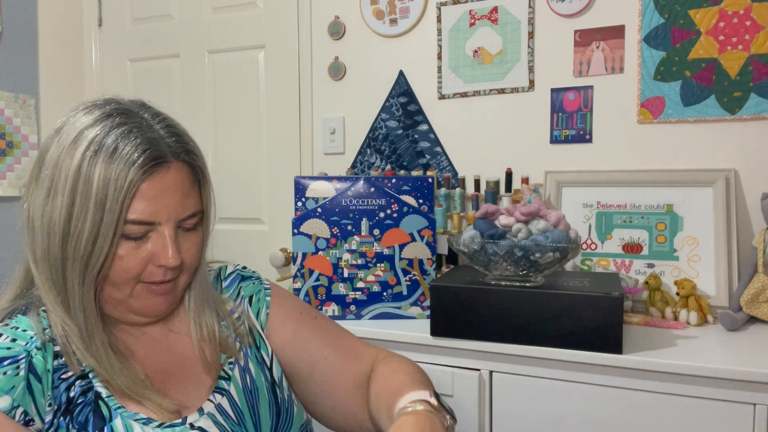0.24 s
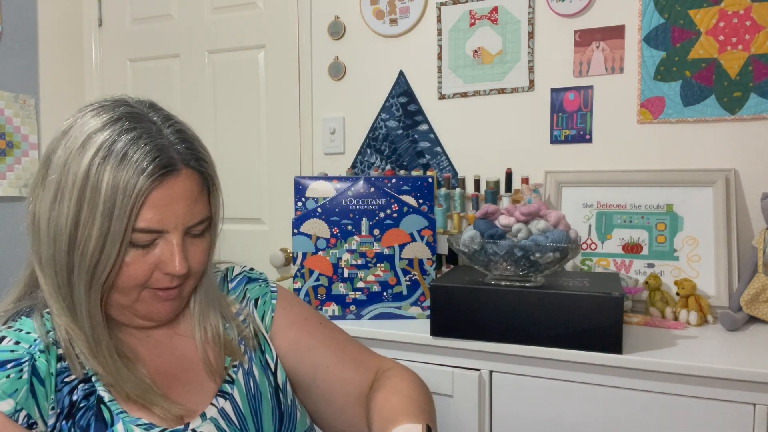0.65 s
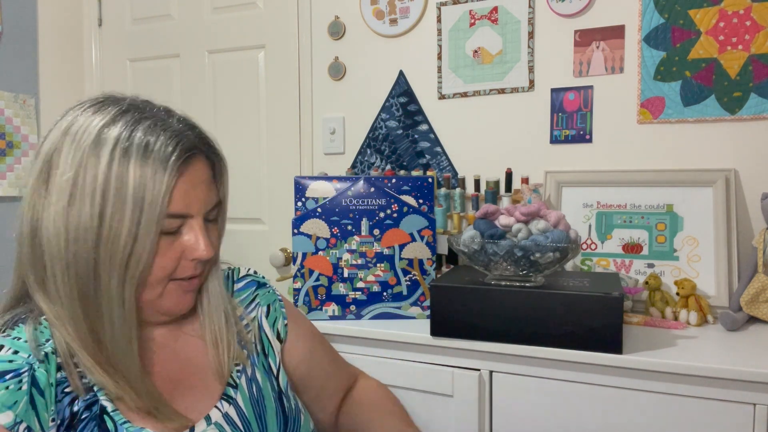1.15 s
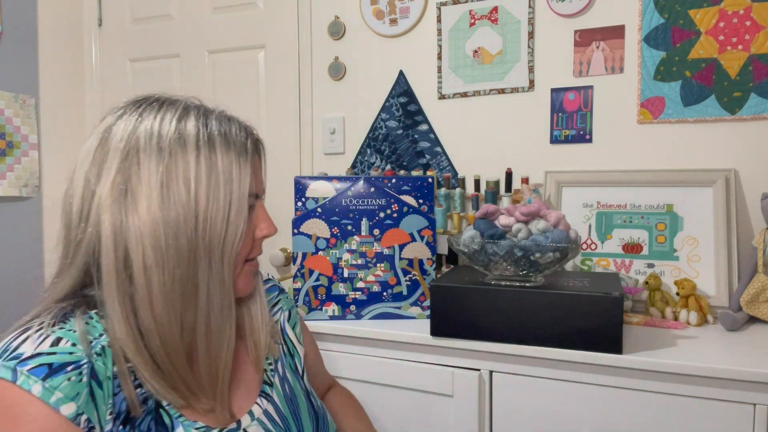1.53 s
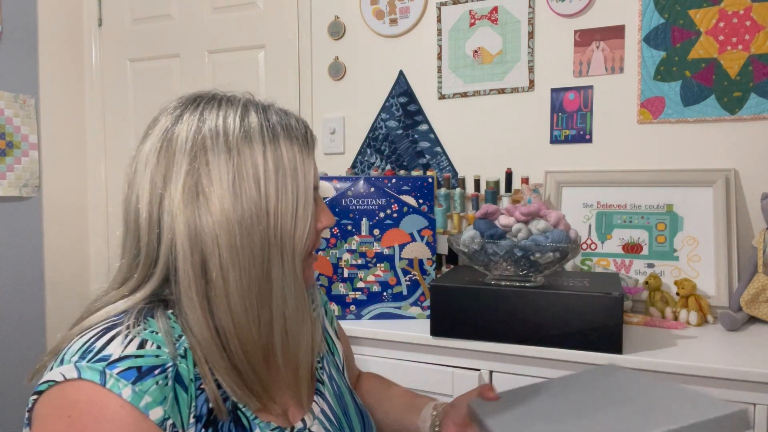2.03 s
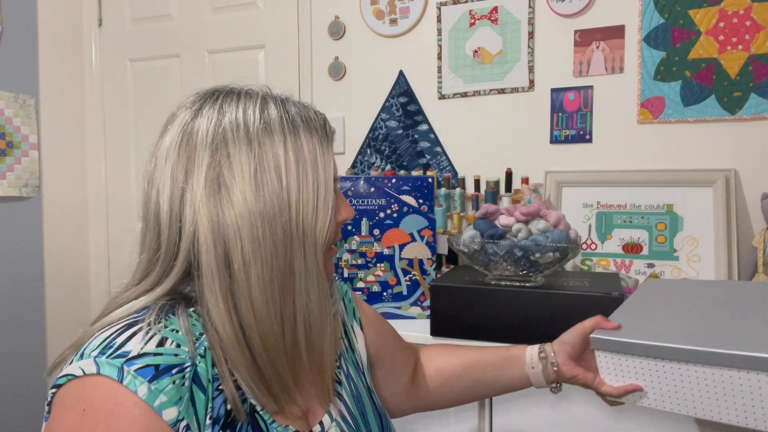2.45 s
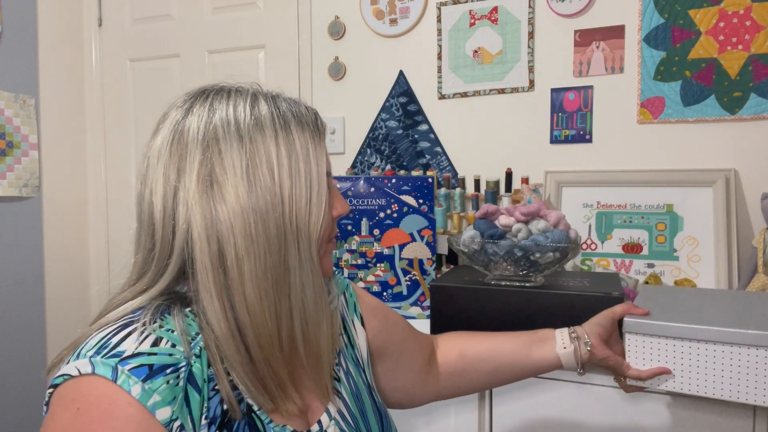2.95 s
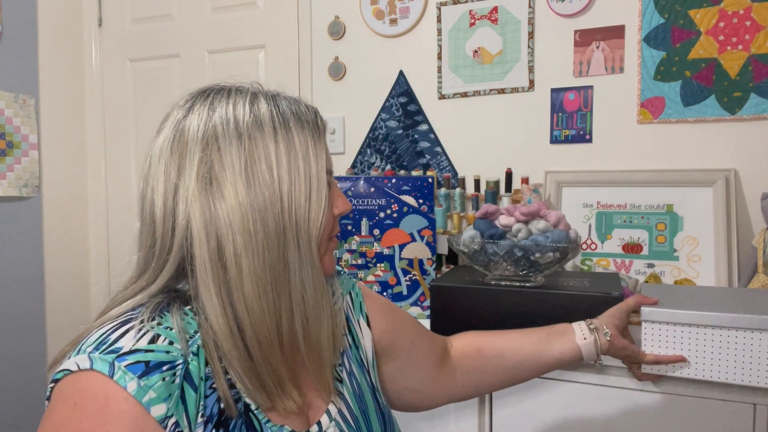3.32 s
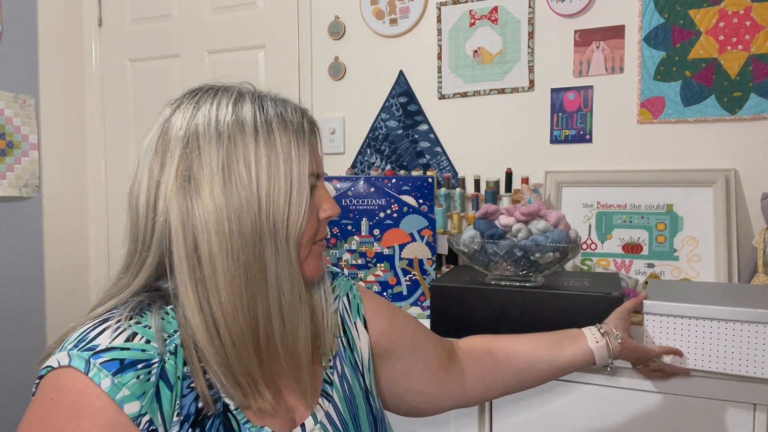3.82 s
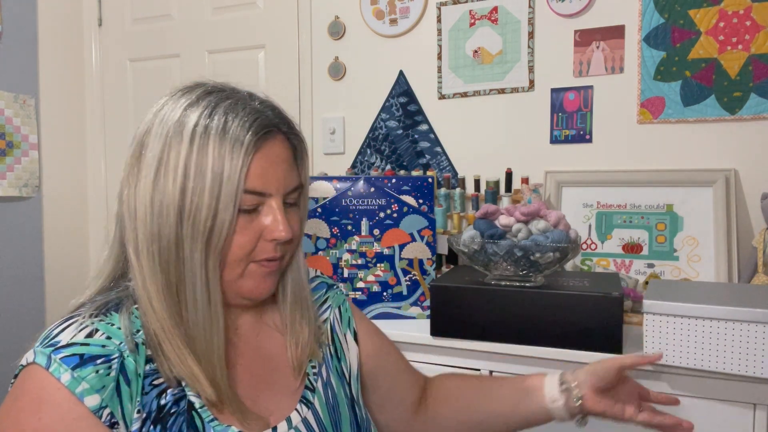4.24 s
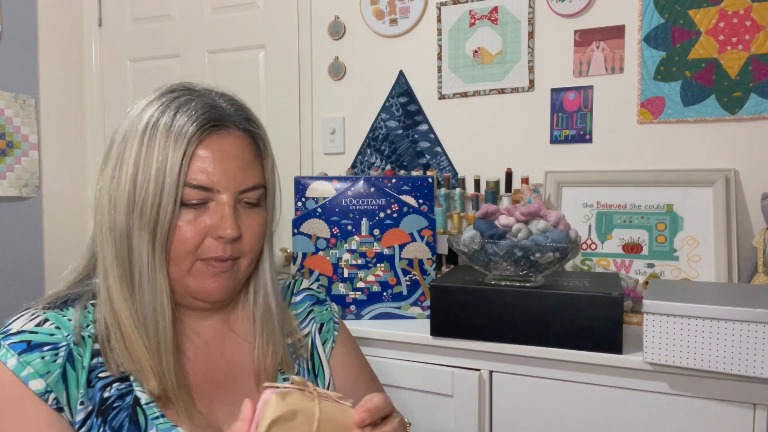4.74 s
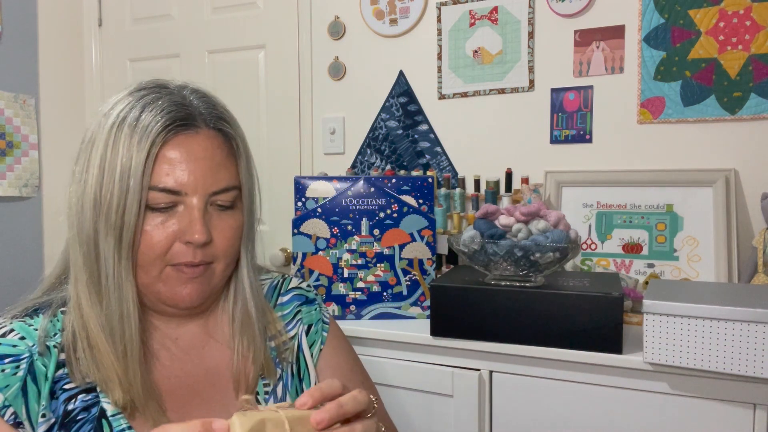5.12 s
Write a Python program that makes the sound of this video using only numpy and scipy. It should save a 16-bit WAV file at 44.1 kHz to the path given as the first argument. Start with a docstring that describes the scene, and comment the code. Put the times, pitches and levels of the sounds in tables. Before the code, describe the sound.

A quiet small room with faint low rumble and hiss, heard by a nearby stereo microphone. Cardboard rubbing swells from the start, and at about 0.37-0.45 s a box is bumped shut with the loudest, hollow, booming thumps and a short rasp. Low juddering drags and soft knocks follow at 0.6-0.85 s. A sharp bracelet tick snaps at 1.16 s, then muffled bumps and shuddering rubs run from 1.3 to 1.85 s, strongest near 1.68 s. Fainter taps fade into near silence from 2.2 to 2.8 s. A scrape leads into the set-down at 3.0-3.16 s: clustered woody knocks with hard rim cracks. The box slides with a soft, grainy scrape until about 3.75 s. A light release tap comes at 3.98 s, small bright ticks at 4.25-4.5 s. From 4.6 s paper rustles finely, with a crisp snap at 4.8 s, light taps, and little crackles to the end.

```python
"""A cardboard box is bumped shut, picked up, set on a cabinet and pushed into place in a small furnished room.
Knocks ring its panels as decaying modes; sliding shakes them with random slips and sawtooth judders.
A bracelet ticks on the moving wrist in sharp snaps. Then a hand takes up a small paper packet:
snapping creases crackle, and fine grains of friction rustle. A stereo microphone stands near by."""
import sys
import numpy as np
from scipy import signal
from scipy.fft import rfft, irfft
from scipy.io import wavfile

SR = 44100
rng = np.random.default_rng(int(sys.argv[2]) if len(sys.argv) > 2 else 0)


def wav_record(signal):
    """Record a signal, one row per channel, as 16-bit PCM in the file named by sys.argv[1]."""
    frames = np.transpose(np.atleast_2d(signal))
    bounded = np.clip(frames, -1, 1)
    # unit amplitude maps onto the largest positive 16-bit level
    quanta = np.round(bounded * 32767).astype(np.int16)
    wavfile.write(sys.argv[1], SR, quanta)


N = 236946
TIME = np.arange(N) / SR
TOP_HZ = 16100  # upper limit of the microphone

# panel modes of box and cabinet: pitch_hz, level_db, t60_s (undamped, before the limit set in ring)
BOX_MODES = [(84.1, -12.5, 0.096), (119.7, -7, 0.26), (182.1, -6.5, 0.23), (243.4, 0, 0.15),
             (277.3, 4.5, 0.086), (354, 0.5, 0.083), (680, -24, .15), (795.5, -7, .15), (893, -18, 0.3),
             (1328, -9, 0.052), (1560, -34.5, 0.2)]
CABINET_MODES = [(86.2, -9.5, 0.15), (142.2, -2, 0.11), (180, -0.5, 0.17), (240.4, 1.5, 0.077),
                 (283, 2.5, 0.13), (364, 11, 0.035), (792, -3, 0.2), (921, 2.5, 0.059), (1159, -5.5, 0.12)]


def undb(db):
    """Decibels to gain."""
    return 10 ** (np.asarray(db) / 20)


def unit(x):
    """Scale to rms 1."""
    return x / np.sqrt(np.mean(x ** 2))


def lookup(table, hz):
    """Read (Hz, value) points on a log-frequency axis."""
    f, value = np.transpose(table)
    return np.interp(np.log(hz + 1), np.log(f), value)


def convolve(x, response):
    """Pass a sound through a response, keeping its length."""
    return signal.fftconvolve(x, response)[:len(x)]


def colour(x, spectrum, size=4096):
    """Causal minimum-phase filter of unit energy, shaped by the given spectrum."""
    gain = undb(lookup(spectrum, np.fft.rfftfreq(size, 1 / SR)))
    cepstrum = irfft(np.log(gain))
    # folding the cepstrum forward makes the filter respond at once
    cepstrum[1:size // 2] *= 2
    cepstrum[size // 2 + 1:] = 0
    response = irfft(np.exp(rfft(cepstrum)))
    return convolve(x, response / np.linalg.norm(response))


def cut(x, hz, kind, order=2):
    """Low-pass or high-pass."""
    sos = signal.butter(order, min(hz, SR / 2 - 1000), kind, fs=SR, output="sos")
    return signal.sosfilt(sos, x)


def add(out, s, sound):
    """Mix a sound in at time s."""
    start = max(int(s * SR), 0)
    out[..., start:start + sound.shape[-1]] += sound[..., :N - start]


def burst(t60, size=16384):
    """A dying spray of noise of unit energy."""
    spray = rng.standard_normal(size) * undb(-60 * TIME[:size] / t60)
    return spray / np.linalg.norm(spray)


def ring(modes, damping=1, rise_s=0.00028, size=16384):
    """Response of a tapped panel, of unit energy; neighbouring modes swing oppositely, so the boom builds up."""
    longest_ring_s = .4
    t, tone = TIME[:size], 0
    for k, (hz, db, t60) in enumerate(modes):
        # card is lossy: the higher the mode, the lower the limit on its ring
        t60 = min(t60, longest_ring_s / (1 + hz / 300))
        envelope = undb(db - 60 * damping * t / t60)
        tone = tone + (-1) ** k * envelope * np.cos(2 * np.pi * hz * t)
    tone = cut(tone * (1 - np.exp(-t / rise_s)), 82.7, "high")
    return tone / np.linalg.norm(tone)


def friction(rate, spread_db, patchy_db, patch_rate=45):
    """Tiny slips of unequal size, coming in patches as the surfaces catch and let go; rates per second."""
    slips = (rng.random(N) < rate / SR) * rng.choice([-1, 1], N)
    sizes = undb(spread_db * np.minimum(rng.exponential(size=N), 4))
    patches = np.interp(TIME * patch_rate, np.arange(N), rng.standard_normal(N))
    return unit(slips * sizes * undb(patchy_db * patches))


def gestures(table, attack_s, release_s):
    """A hand's swell, hold and release per row, summed in power; one gain curve for each dB column."""
    power = np.zeros((len(table[0]) - 2, N))
    for s, length, *db in table:
        start = max(s - attack_s, 0)
        t = TIME[:int((attack_s + length + release_s) * SR)] + start - s
        # attack and release are the times to move 60 dB
        fade = np.maximum(-t, 0) / attack_s + np.maximum(t - length, 0) / release_s
        add(power, start, np.outer(undb(db), undb(-60 * fade)) ** 2)
    return np.sqrt(power)


def knocks(table, modes, ring_db, slap_db, slap_t60):
    """Each blow rings the panels and slaps the card; a softer contact keeps only the low notes."""
    # spectrum of the slap: pitch_hz, level_db
    slap_spectrum = [(60, -15), (200, 1), (400, 4), (800, -3), (1400, -15.5), (2500, -5), (5000, -9.5),
                     (15000, 2.5)]
    out, tone = np.zeros(N), ring(modes)
    for s, db, corner_hz, extra_db in table:
        slap = colour(burst(slap_t60), slap_spectrum)
        blow = undb(ring_db) * tone + undb(slap_db + extra_db) * slap
        add(out, s, undb(db) * cut(blow, corner_hz, "low", order=3))
    return out


def clicks(table, spectrum, level_db, click_t60, splinter_db):
    """One sharp snap with a little splintering; the smaller the thing that snaps, the less bass it has."""
    out = np.zeros(N)
    for s, db, low_hz in table:
        snap = undb(splinter_db) * burst(click_t60, size=2048)
        snap[0] += 1
        snap = cut(colour(snap, spectrum), low_hz, "high", order=4)
        add(out, s, undb(level_db + db) * snap)
    return out


def room(dry, wet_db, right_db, lag_ms, apart=2.86, gap_s=0.00018, diffuse_hz=380, count=12, size=3):
    """Direct sound, later at the left port, plus a short tail that differs at the two ports and keeps shifting."""
    # reverberation time of the room: pitch_hz, t60_s
    room_t60 = [(200, 0.25), (1000, 0.2), (4000, 0.14), (8000, 0.13)]
    moves_per_s = 9  # new patterns of reflections per second
    t = TIME[:SR // 3]
    octave = np.log2(np.fft.rfftfreq(len(t), 1 / SR) + 1)
    centres = np.linspace(np.log2(100), np.log2(TOP_HZ), count)
    shared, *own = rfft(rng.standard_normal((3, size, len(t))))

    # the sound wanders among several tails at constant total power
    paths = rng.standard_normal((size, 100))
    places = np.array([np.interp(TIME * moves_per_s, np.arange(len(path)), path) for path in paths])
    sent = dry * places / np.linalg.norm(places, axis=0)

    ports = []
    for field in shared + apart * np.array(own):
        tails = 0
        for centre, band in zip(centres, np.eye(count)):
            noise = irfft(field * np.interp(octave, centres, band), len(t))
            tails = tails + noise * undb(-60 * t / lookup(room_t60, 2 ** centre))
        # the tail waits for the first reflection and lacks deep bass
        tails = cut(tails * np.clip(t / gap_s - .5, 0, 1), diffuse_hz, "high")
        wet = sum(convolve(part, tail / np.linalg.norm(tail)) for part, tail in zip(sent, tails))
        ports.append(dry + undb(wet_db) * wet)

    lag = np.exp(-2j * np.pi * np.fft.rfftfreq(N, 1000 / SR) * lag_ms)  # frequency in kHz
    left = irfft(rfft(ports[0]) * lag, N)
    return np.array([undb(-right_db / 2) * left, undb(right_db / 2) * ports[1]])


def room_air():
    """A faint steady rumble, partly shared by the two ports, and a separate hiss in each."""
    # spectrum of the air: pitch_hz, level_db
    air_spectrum = [(20, -11.5), (50, -3), (85, 0), (130, -11), (280, -12.5), (600, -16.5), (1500, -25.5),
                    (5000, -34), (16000, -56)]
    air_db, mic_hiss_db = -60.5, -72
    shared, left, right = (colour(noise, air_spectrum) for noise in rng.standard_normal((3, N)))
    hiss = undb(mic_hiss_db) * rng.standard_normal((2, N))
    air = unit(0.6 * cut(shared, 280, "low") + np.array([left, right]))
    return undb(air_db) * air + hiss


def packet_taps():
    """Fingers land on the packet, ringing its small panels and slapping the wrapping."""
    # landings: start_s, level_db, contact_corner_hz, slap_db
    taps = [(4.7965, -17.5, 1860, 6), (4.839, -20, 2000, -9), (4.911, -22, 2230, 2), (4.950, -32, 1800, -1),
            (4.981, -25.5, 1600, 3)]
    # panel modes: pitch_hz, level_db, t60_s (before the limit set in ring)
    packet_modes = [(314, -2, 0.11), (474, -8, 0.1), (764, 0, 0.037), (932, 8.5, 0.042), (1230, 12, 0.017),
                    (1590, 1.5, 0.023)]
    return knocks(taps, packet_modes, ring_db=0.5, slap_db=13.0, slap_t60=0.079)


def packet_creases():
    """Creases of the packet snap with a short splintering crackle."""
    # snaps: start_s, level_db, lowest_pitch_hz
    creases = [(4.7945, -3, 880), (4.7961, -6.5, 510), (4.839, -29, 800), (4.911, -13, 890),
               (4.919, -12.5, 1200), (4.980, -27, 910), (5.1205, -16.5, 2320), (5.216, -17.5, 2370),
               (5.268, -14.5, 2540)]
    # spectrum of a snap: pitch_hz, level_db
    crease_spectrum = [(100, -10.5), (450, 4), (900, 0), (1800, 8), (3500, 6), (7000, 6), (12000, -7),
                       (16000, -18)]
    return clicks(creases, crease_spectrum, level_db=-14.0, click_t60=0.0085, splinter_db=9.5)


def rustling_packet():
    """Fingers brush the wrapping in fine grains, small crinkles break through, and paper flexes in coarser folds."""
    # fingers brushing over skin and wrapping: full_speed_s, length_s, level_db
    brushes = [(.865, 0.016, -54.5), (1.13, 0.12, -51), (1.61, 0.033, -52.5), (4.07, 0.464, -63.5),
               (4.582, 0.042, -48.5), (4.68, 0.086, -48), (4.805, 0.084, -45.5), (4.897, 0.027, -43),
               (4.96, 0.048, -54), (5.053, 0.14, -49.5), (5.254, 0.028, -42.5), (5.355, .02, -52)]
    # the packet flexes under a squeeze: full_force_s, length_s, level_db
    squeezes = [(4.59, 0.48, -60.5), (4.80, 0.087, -53.5), (4.942, 0.028, -48), (5.025, 0.015, -57)]
    # spectra of brushed paper and of flexing: pitch_hz, level_db
    paper_spectrum = [(700, -28), (2000, -10), (3500, -1.5), (7000, -1), (12000, -1.5), (16000, -23)]
    flex_spectrum = [(120, -13.5), (420, 7), (900, -2.5), (1400, -1), (2200, -2.5), (5000, -44)]
    brush, = gestures(brushes, attack_s=0.15, release_s=0.09)
    flex, = gestures(squeezes, attack_s=.015, release_s=.07)
    grains = friction(rate=7700, spread_db=1.5, patchy_db=2.5, patch_rate=140)
    crinkles = friction(rate=320, spread_db=2.5, patchy_db=2)
    folds = colour(flex * friction(rate=350, spread_db=2.5, patchy_db=2), flex_spectrum)
    rustle = colour(brush * (undb(-2.5) * grains + undb(-13.0) * crinkles), paper_spectrum)
    return rustle + undb(-3.0) * folds


def bracelet_ticks():
    """Bracelet and fingernail tick: tiny hard contacts, sharp and almost without bass."""
    # ticks: start_s, level_db, lowest_pitch_hz
    ticks = [(.387, -19, 4000), (.657, -25, 3620), (1.1626, -13.5, 3000), (1.1643, 0, 1470),
             (1.1745, -13, 2580), (2.019, -24.5, 3900), (2.145, -31.5, 4000), (2.940, -13, 5660),
             (4.255, -16, 5000), (4.272, -19.5, 4090), (4.340, -25.5, 5000), (4.390, -16.5, 3900),
             (4.4855, -22.5, 6040)]
    # spectrum of a tick: pitch_hz, level_db
    tick_spectrum = [(100, -13), (1500, -15.5), (3300, 9.5), (7000, 11), (12000, 3), (16000, -13)]
    return clicks(ticks, tick_spectrum, level_db=-8.5, click_t60=0.0035, splinter_db=5.5)


def cabinet_knocks():
    """The box meets the cabinet top, and the blows ring the cabinet's panels."""
    # meetings: start_s, level_db, contact_corner_hz, slap_db
    landings = [(2.986, -19, 880, -2), (2.997, -12, 300, -11), (3.0172, -5, 1600, 5), (3.028, -14, 1700, 9),
                (3.039, -11, 600, 2), (3.049, -11.5, 557, 13), (3.078, -11, 243, 3), (3.1335, -12, 1010, 8),
                (3.143, -22, 1100, 6), (3.155, -2, 303, -12), (3.311, -23, 390, -14),
                (3.9826, -26, 2830, 5.5), (3.995, -23, 1950, 7), (4.222, -29.5, 190, -7)]
    return knocks(landings, CABINET_MODES, ring_db=7.0, slap_db=9.0, slap_t60=0.026)


def rim_cracks():
    """The hard rim of the box cracks against the cabinet in splintering snaps."""
    # cracks: start_s, level_db, lowest_pitch_hz
    cracks = [(3.0168, 0.5, 1200), (3.028, -8.5, 1400), (3.1345, -5, 1200), (3.9826, -14, 920)]
    # spectrum of a crack: pitch_hz, level_db
    rim_spectrum = [(1000, 16.5), (3500, 6.5), (6000, 0), (15000, -38)]
    return clicks(cracks, rim_spectrum, level_db=-19.5, click_t60=0.023, splinter_db=10.0)


def scuffs(width=0.35):
    """Card rubs card: a quick swell and fade of noise in one resonance, its width a fraction of its pitch."""
    # rubs: start_s, length_s, level_db, pitch_hz
    rubs = [(0.394, 0.027, -43.5, 1310), (0.598, 0.093, -65, 940), (1.322, 0.036, -58.5, 1350),
            (1.379, 0.02, -58, 1060), (1.479, 0.046, -55.5, 1390), (1.76, 0.17, -71, 1610),
            (2.843, 0.045, -53.5, 980), (2.901, 0.12, -58.5, 1260)]
    out = np.zeros(N)
    for s, length, db, hz in rubs:
        swell = np.hanning(int(length * SR))
        b, a = signal.iirpeak(hz, 1 / width, fs=SR)
        rub = signal.lfilter(b, a, rng.standard_normal(len(swell)))
        add(out, s, undb(db) * swell * unit(cut(rub, 2 * hz, "low")))
    return out


def sliding_box():
    """Coarse slips shake the hand-damped panels, finer ones scrape, and the fibres of the surface hiss."""
    # strokes of hand or shelf along the cardboard: full_speed_s, length_s, shudder_db, scrape_db, hiss_db
    strokes = [(.15, 0.0045, -50.5, -63, -64), (.31, 0.12, -45.5, -50.5, -51),
               (.615, 0.14, -48.5, -54, -66.5), (.84, 0.059, -48.5, -54, -69), (1.31, 0.23, -51, -60, -89),
               (1.335, 0.0076, -74, -66, -60), (1.47, 0.15, -45, -58.5, -58), (1.69, 0.022, -33, -53, -59),
               (1.76, 0.1, -54.5, -71, -83), (2.89, 0.16, -68, -53, -54), (3.15, 0.038, -44, -45.5, -46.5),
               (3.19, 0.21, -50.5, -53.5, -49), (3.435, 0.17, -48, -51.5, -57.5),
               (3.62, 0.072, -52.5, -52, -51), (3.72, 0.028, -48, -59.5, -76)]
    # an edge of the box catches in a short rasp: full_speed_s, length_s, shudder_db, scrape_db, hiss_db
    rasps = [(.372, 0.047, -26.5, -39, -58), (1.166, 0.012, -59, -55.5, -44.5),
             (1.547, 0.0029, -47, -45, -46.5), (1.603, 0.022, -59, -68, -50),
             (2.864, 0.0033, -72, -50.5, -47), (2.941, 0.0061, -51.5, -40, -43.5),
             (3.02, 0.014, -36, -43, -46)]
    # spectra of scraping edge and hissing fibres: pitch_hz, level_db
    scrape_spectrum = [(150, -24), (400, -5.5), (600, 2.5), (950, 3), (1500, -2), (2200, -10),
                       (4000, -19.5), (10000, -60)]
    hiss_spectrum = [(600, -18), (1600, 2.5), (3200, 8.5), (7000, 0), (12500, -4), (16000, -24)]
    stroke_gains = gestures(strokes, attack_s=0.21, release_s=0.14)
    rasp_gains = gestures(rasps, attack_s=.012, release_s=.07)
    shudder, scrape, hiss = np.hypot(stroke_gains, rasp_gains)
    body = cut(ring(BOX_MODES, damping=1.75) + ring(CABINET_MODES, damping=2.7), 408, "low")
    panels = convolve(shudder * friction(rate=97, spread_db=-3.0, patchy_db=5), body)
    edge = colour(scrape * friction(rate=2000, spread_db=3.0, patchy_db=2.5), scrape_spectrum)
    fibres = colour(hiss * friction(rate=9000, spread_db=0.5, patchy_db=1.2), hiss_spectrum)
    return undb(-10.0) * panels + undb(-9.5) * edge + undb(-6.0) * fibres


def judders(jitter=0.1, size=150):
    """Card drags and lets go in a nearly regular sawtooth, heard through the damped panels."""
    # stick and slip: start_s, length_s, level_db, mean_slip_rate_hz
    slips = [(0.307, 0.054, -34, 272), (0.602, 0.082, -31.5, 187), (0.622, 0.15, -36.5, 277.3),
             (3.443, 0.15, -45, 289.8)]
    out, panel = np.zeros(N), ring(BOX_MODES, damping=17.9)
    for s, length, db, hz in slips:
        swell = signal.windows.tukey(int(length * SR), .6)
        uneven = np.repeat(rng.standard_normal(size), size)[:len(swell)]
        phase = 2 * np.pi * np.cumsum(hz * (1 + jitter * uneven)) / SR
        drag = convolve(signal.sawtooth(phase), panel)
        add(out, s, undb(db) * swell * unit(cut(drag, 1.14 * hz, "low")))
    return out


def box_knocks():
    """Knocks on the box while it is low down set its cardboard panels booming."""
    # knocks: start_s, level_db, contact_corner_hz, slap_db
    bumps = [(.366, -11, 1120, 18), (.3722, 8.5, 1420, -9), (.3935, 10, 403, 1), (.409, 3, 1210, -9.5),
             (.419, -6, 436, 8.5), (.436, 0, 800, -15), (.448, -1.5, 397, 1), (.586, -22.5, 523, 4.5),
             (.606, -21, 450, 15), (.617, -25.5, 910, 12.5), (.735, -15, 348, -7), (.811, -22.5, 600, -0.5),
             (.824, -17.5, 333, 5), (1.148, -16, 362, -4.5), (1.1655, -20, 398, 1.5),
             (1.270, -21.5, 503, -21), (1.297, -26.5, 900, 3), (1.528, -21.5, 700, 1),
             (1.5455, -20.5, 3300, 5.5), (1.620, -13, 786, -2.5), (1.648, -29, 1100, 5),
             (1.670, -17, 546, 5), (1.683, -9.5, 550, 1.5), (1.773, -19, 730, 2), (1.841, -25.5, 430, 1),
             (1.971, -21, 555, 1.5), (2.143, -27.5, 1460, 8.5), (2.196, -35.5, 1410, 12.5),
             (2.507, -42, 1830, 10.5)]
    return knocks(bumps, BOX_MODES, ring_db=2.0, slap_db=13.5, slap_t60=0.061)


def scene():
    """Packet, bracelet, cabinet and box, each with its own echo and stereo balance, over the room air."""
    packet = packet_taps() + packet_creases() + rustling_packet()
    ticks = bracelet_ticks()
    cabinet = cabinet_knocks() + rim_cracks()
    sliding = sliding_box() + scuffs()
    box = box_knocks() + judders()
    return (room_air()
            + room(packet, wet_db=-4.0, right_db=1.5, lag_ms=0.061)
            + room(ticks, wet_db=0.5, right_db=1.0, lag_ms=0.056)
            + room(cabinet, wet_db=-2.5, right_db=3.5, lag_ms=0.2)
            + room(sliding, wet_db=6.0, right_db=2, lag_ms=0.12)
            + room(box, wet_db=-4.5, right_db=3.0, lag_ms=0.096))


def record(dry):
    """The microphone thins the deepest bass and cuts the top."""
    thinned = cut(dry, 36, "high", order=4)
    top_cut = signal.ellip(8, .2, 70, TOP_HZ, fs=SR, output="sos")
    return signal.sosfilt(top_cut, thinned)


dry = scene()
out = record(dry)
wav_record(out)
```